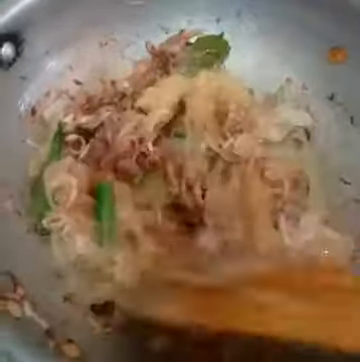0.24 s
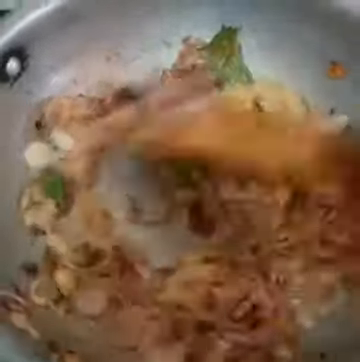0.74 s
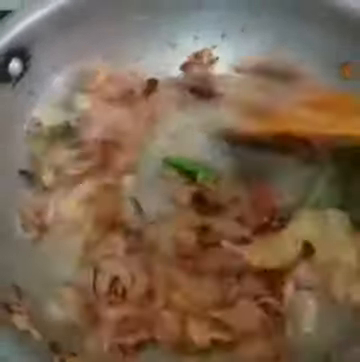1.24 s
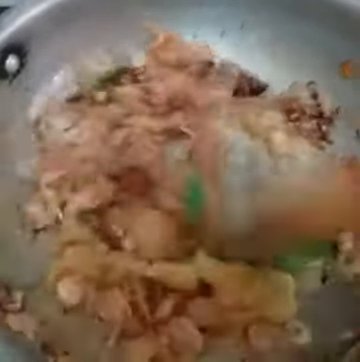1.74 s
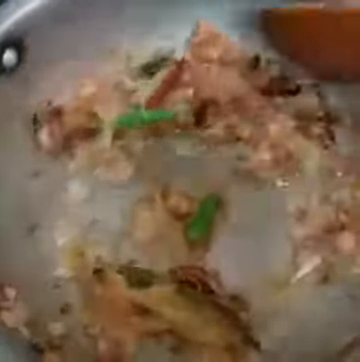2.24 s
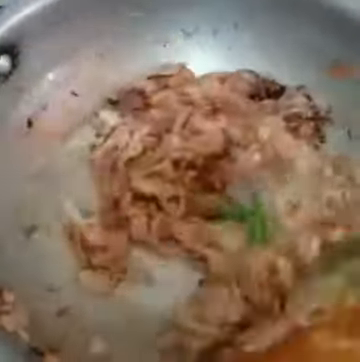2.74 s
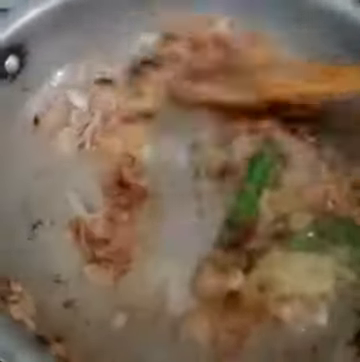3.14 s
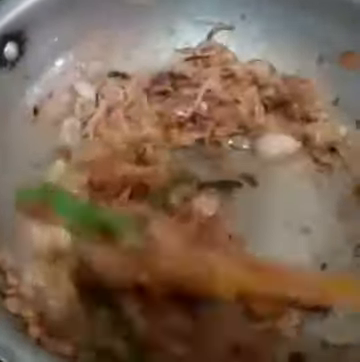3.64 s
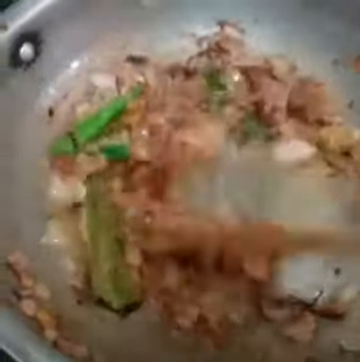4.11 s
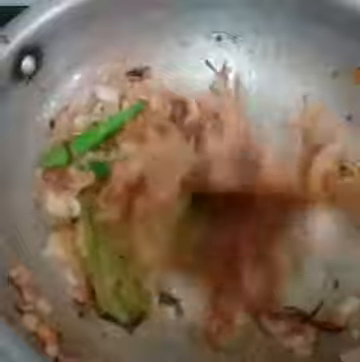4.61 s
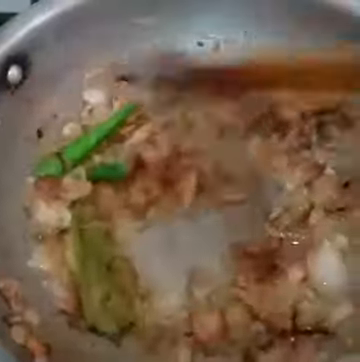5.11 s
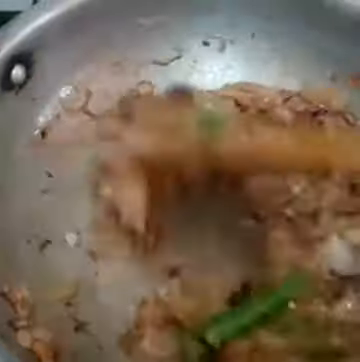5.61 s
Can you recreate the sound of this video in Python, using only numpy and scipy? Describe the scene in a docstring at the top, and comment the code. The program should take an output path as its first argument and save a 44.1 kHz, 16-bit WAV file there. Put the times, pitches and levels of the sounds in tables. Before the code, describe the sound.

Sliced onions and paste sizzle loudly in a thin metal pan while a wooden spatula knocks and scrapes, with a brief lull midway.

```python
"""Onions and paste fry in hot oil in a thin metal pan, close under a mono microphone.
From the start countless steam bubbles burst into a dense fizz with a few spits, over a low steady rush;
a wooden spatula knocks and drags on the pan, which rings dully and rocks on its stand. The frying
and the drag ease from about 1.8 s and return near 2.8 s. One dead, low thump falls at 4.2 s and a faint
low note swells at 5.3 s. Filtered noise, trains of pips and decaying sines make these sounds."""
import sys
import numpy as np
from scipy import signal
from scipy.io import wavfile
from scipy.ndimage import uniform_filter1d

SR = 44100
rng = np.random.default_rng(int(sys.argv[2]) if len(sys.argv) > 2 else 0)


def to_wav(s):
    """Save 16-bit WAV."""
    ch = np.atleast_2d(s).T  # columns
    pcm = np.round(np.clip(ch, -1, 1) * 32767)  # PCM
    wavfile.write(sys.argv[1], SR, pcm.astype(np.int16))


def rack_gain(trim_db):
    """Turn a fader trim in dB into the linear factor to multiply a signal by."""
    fader = np.asarray(trim_db, float)
    return 10 ** (fader / 20)


N = 258326  # samples

# blows of the spatula: (time [s], wall peak level [dB], level of the bottom's loudest stretch [dB],
# peak level of the rocking on the stand [dB], frequency favoured by the spot [Hz])
SPATULA_BLOWS = [(.221, -31, -35, -38, 634), (.297, -30, -32.5, -32.5, 286), (.466, -33, -58, -43, 1090),
                 (.56, -23, -36, -38, 944), (.706, -23, -34.5, -36.5, 1020), (.895, -22.5, -32, -31, 278),
                 (1.143, -18.5, -35, -33, 1030), (1.357, -30.5, -36, -48, 296), (1.533, -22, -35, -37, 935),
                 (1.858, -35, -47, -53, 650), (1.929, -28, -43, -39.5, 575), (2.215, -41, -45, -51, 310),
                 (2.736, -35, -38.5, -45, 970), (2.864, -23, -47, -41, 1010), (3.031, -36, -57, -63, 1010),
                 (3.22, -27, -34.5, -34.5, 865), (3.236, -25, -47, -50, 600), (3.421, -19, -45, -43, 980),
                 (3.495, -39, -55, -63, 969), (3.692, -26.5, -39.5, -44.5, 1050),
                 (3.95, -33, -48.5, -53, 980), (4.173, -32, -41, -38, 600), (4.24, -32, -54, -53, 996),
                 (4.293, -19.5, -32.5, -34.5, 1030), (4.341, -42, -39, -49, 313),
                 (4.767, -24, -33.5, -38.5, 700), (4.834, -22, -36.5, -40, 1030),
                 (5.04, -38, -34, -47.5, 312), (5.478, -25, -34, -32.5, 860), (5.512, -25, -35, -52, 845),
                 (5.623, -21, -39.5, -40, 1050), (5.722, -20, -30.5, -39, 1016),
                 (5.796, -31, -47, -59, 1030)]
# ringing modes of the pan's bottom:
# (frequency [Hz], relative level [dB], decay time t60 [s] before the damping factor)
BOTTOM_MODES = [(160, 5.5, 0.018), (187, -11, 0.19), (244.2, -4.5, 0.2), (281.7, -1.5, 0.14),
                (318.3, 2, 0.12), (362, -20, 0.062), (384.8, -6.5, 0.27)]
# ringing modes of the pan's wall:
# (frequency [Hz], relative level [dB], decay time t60 [s] before the damping factor)
WALL_MODES = [(505, 4, 0.059), (614, -5.5, 0.23), (672, -8.5, 0.21), (753, -4, 0.18), (868, 1, 0.14),
              (948, -6, 0.2), (994.6, 7, 0.087), (1080, 0, 0.086), (1124, -2, 0.1), (1341, -5, 0.14),
              (1449, -7, 0.3)]


def evened(x):
    """Scales a signal to an rms of one."""
    return x / np.sqrt(np.mean(x ** 2) + 1e-20)


def loudest_one(sound, size):
    """Scales so that the loudest stretch of size samples has an rms of one."""
    return sound / np.sqrt(uniform_filter1d(sound ** 2, size).max())


def over_time(rows, t):
    """Joins rows of (time, level) by straight lines and reads them at t."""
    times, levels = np.transpose(rows)
    return np.interp(t, times, levels)


def over_frequency(points, hz):
    """Joins points of (frequency, level) by straight lines on a log frequency axis."""
    frequencies, levels = np.transpose(points)
    return np.interp(np.log(hz + 1), np.log(frequencies + 1), levels)


def add(mix, s, sound):
    """Lays a sound into the mix from s seconds on, cut at the end of the mix."""
    part = mix[round(s * SR):][:len(sound)]
    part += sound[:len(part)]


def shaped(x, field_db, size):
    """Weights the short-time spectrum of x by field_db(hz, t)."""
    overlap = size * 3 // 4
    hz, t, spectrum = signal.stft(x, SR, nperseg=size, noverlap=overlap)
    weighted = spectrum * rack_gain(field_db(hz[:, None], t))
    return signal.istft(weighted, SR, nperseg=size, noverlap=overlap)[1][:N]


def ring(modes, heights, rise, damping=0.58):
    """Sines that swell over about rise seconds and die; damping multiplies every decay rate."""
    t = np.arange(SR // 2) / SR
    sound = np.zeros(len(t))
    for height, (hz, db, t60) in zip(heights, modes):
        decay = rack_gain(db - 60 * damping * t / t60)
        sound += height * decay * np.sin(2 * np.pi * hz * t)
    return sound * (1 - np.exp(-(t / rise) ** 2))


def favour(modes, hz, octaves, chance):
    """Mode heights for one spot: strongest near hz, of either sign, a little uneven."""
    away = np.log2(np.transpose(modes)[0] / hz) / octaves
    focus_db = -11 * (1 - np.exp(-away ** 2))
    return rack_gain(focus_db + 2.5 * chance) * np.resize([1, -1], len(modes))


def bubbles(per_s, cycles, spread_db, count):
    """Rising pips of many sizes, each pitch with its own random train and an even share of the spectrum."""
    out = np.zeros(N)
    for hz in np.geomspace(1500, 15500, count):
        turns = np.arange(round(3 * cycles * SR / hz)) * hz / SR
        rising = np.sin(2 * np.pi * turns * (1 + 0.01555 * turns / cycles))
        pip = rising * turns * np.exp(-2.5 * turns / cycles)
        size = rack_gain(spread_db * np.minimum(rng.exponential(1, N), 4))
        train = size * (rng.random(N) < per_s / count / SR)
        out += signal.oaconvolve(train, pip * np.sqrt(hz / (pip ** 2).sum()))[:N]
    return evened(out)


def fizz():
    """A dense spray of tiny bursts with pops, pips and long pips of fine tonal grain; clusters flare."""
    # vigour of the frying: (time [s], level [dB])
    frying_vigour = [(0.0, -29.5), (0.1, -24.5), (.15, -28.5), (0.24, -28.5), (0.31, -23), (0.41, -25),
                     (.55, -24.5), (0.65, -25), (0.71, -20.5), (.78, -24), (0.95, -27.5), (1.06, -25),
                     (1.66, -28.5), (1.82, -33), (1.93, -31.5), (2.3, -35), (2.73, -35), (2.77, -29),
                     (3.14, -27.5), (3.19, -25.5), (3.3, -27), (3.39, -24.5), (3.55, -27), (3.72, -25),
                     (3.88, -28.5), (4.49, -28.5), (4.58, -25.5), (4.72, -29), (4.78, -25), (5.43, -27.5),
                     (5.58, -24), (5.86, -29)]
    # finest bubbles, the top octave; heard as swings against the vigour: (time [s], level [dB])
    finest_bubbles = [(0.0, -29), (.05, -27.5), (.24, -26.5), (0.33, -21.5), (0.55, -25.5), (0.66, -21.5),
                      (1.05, -24.5), (1.15, -24), (1.66, -27), (1.8, -32), (1.93, -28.5), (2.6, -35),
                      (2.73, -32.5), (2.78, -30), (2.95, -26), (3.47, -25), (3.57, -28), (3.7, -22.5),
                      (3.82, -26), (4.74, -27), (4.82, -24), (5.48, -26.5), (5.56, -22), (5.86, -29)]
    # larger wet bubbles, the lower part; heard as swings against the vigour: (time [s], level [dB])
    wet_bubbles = [(0.0, -32), (0.08, -30.5), (.2, -31), (0.42, -27), (0.57, -33.5), (0.63, -27.5),
                   (1.2, -31), (1.6, -32), (1.8, -37), (1.92, -36.5), (2.3, -41), (2.73, -37.5),
                   (2.77, -33.5), (3.14, -32), (3.19, -30), (3.7, -29), (3.9, -31), (4.5, -33), (4.54, -27),
                   (4.7, -31.5), (5.45, -29.5), (5.53, -25), (5.74, -33.5), (5.86, -28)]
    # colour as the close microphone hears it: (frequency [Hz], relative level per Hz [dB])
    fizz_colour = [(880, -12), (1500, -11.5), (1610, -13), (1840, -5), (2840, -2), (3130, -1), (4380, -1),
                   (5280, 2), (6610, 1), (7590, 5), (9150, -8), (10100, -3), (11100, -3.5), (14900, 2.5),
                   (15700, 1.5)]

    pop_times = rng.random(N) < 400 / SR
    pop_sizes = rack_gain(3.3 * np.minimum(rng.exponential(1, N), 3))
    pops = pop_times * rng.choice([-1, 1], N) * pop_sizes
    pips = bubbles(per_s=2500, cycles=12.9, spread_db=3.0, count=30)
    long_pips = bubbles(per_s=1500, cycles=151.0, spread_db=0.5, count=70)  # narrow in pitch
    spray = rng.standard_normal(N) + rack_gain(-13) * evened(pops)
    bursts = evened(spray + rack_gain(-10) * pips + rack_gain(-7) * long_pips)

    def field_db(hz, t):
        """Level of the fizz at each frequency and time."""
        patches = rng.standard_normal((len(t), len(hz))).T
        patches = uniform_filter1d(patches, size=16, axis=0)  # across frequency
        patches = evened(uniform_filter1d(patches, size=10, axis=1))  # across time
        flicker = evened(uniform_filter1d(rng.standard_normal(len(t)), size=14))
        vigour = over_time(frying_vigour, t)
        fine = over_time(finest_bubbles, t) - vigour
        wet = over_time(wet_bubbles, t) - vigour
        high = np.clip((hz - 8000) / 2500, 0, 1)
        low = np.clip((4800 - hz) / 1500, 0, 1)
        deep = np.clip((900 - hz) / 400, 0, 1)
        colour = over_frequency(fizz_colour, hz) - 30 * deep  # bubbles are too small to sound low
        colour = colour + high * (fine - fine.mean()) + low * (wet - wet.mean())
        return vigour + colour + 1.08 * patches + 0.52 * flicker

    return rack_gain(6) * shaped(bursts, field_db, size=256)


def spits():
    """A pocket of water bursts: a sharp crack, a few cycles of ring and a short spray."""
    # the loudest spits: (time [s], level [dB], frequency of the ring [Hz])
    loudest_spits = [(0.2543, -9, 13100), (1.0335, -12, 7080), (1.6077, -13, 14400), (1.9245, -14, 13800),
                     (3.281, -4, 7710), (3.6187, -10, 7680), (4.1848, -8, 7730), (4.5435, -9, 5000),
                     (5.5243, -10, 5500)]
    small_per_s, small_db, small_spread_db = 4, -16, 4
    out, t = np.zeros(N), np.arange(400) / SR
    when, size, pitch = rng.random((round(small_per_s * N / SR), 3)).T
    levels = small_db + small_spread_db * (2 * size - 1)
    small_spits = zip(when * N / SR, levels, 5000 * 3 ** pitch)
    for s, db, hz in list(loudest_spits) + list(small_spits):
        crack = rack_gain(-2) * np.sin(2 * np.pi * hz * t) * rack_gain(-60 * t / 0.0018)
        hiss = np.diff(rng.standard_normal(len(t) + 1))  # the difference favours the treble
        spray = rack_gain(-7.5) * hiss * rack_gain(-60 * t / 0.0094)
        add(out, s, rack_gain(db) * (crack + spray))
    return out


def blows():
    """Each blow lands on another spot, chatters, bounces once and rubs on as a dull thud."""
    # the blade lands flat a second time
    bounce_s, bounce_spread, bounce_wall_db, bounce_bottom_db = 0.026, 0.2, -14, -9
    rub_db, rub_wall_share = -1.5, 0.28  # the rub against the blend of wall and bottom levels
    walls, bottoms = len(WALL_MODES), len(BOTTOM_MODES)
    out, t = np.zeros(N), np.arange(4000) / SR
    dull = signal.butter(3, [150, 1180], "band", fs=SR, output="sos")
    chances = rng.standard_normal((len(SPATULA_BLOWS), bottoms + walls + len(t)))
    for (s, wall_db, bottom_db, _, spot_hz), chance in zip(SPATULA_BLOWS, chances):
        chatter = rack_gain(-31) * chance[-len(t):] * rack_gain(-60 * t / 0.11)
        chatter[0] = 1  # the first contact
        bounce_at = round(SR * bounce_s * np.exp(bounce_spread * chance[-1]))
        bounce = np.arange(len(t)) == bounce_at

        wall_heights = favour(WALL_MODES, spot_hz, 0.16, chance[:walls])
        wall = ring(WALL_MODES, wall_heights, rise=0.0011, damping=1.2)
        wall = signal.fftconvolve(wall, chatter + rack_gain(bounce_wall_db) * bounce)
        add(out, s, rack_gain(wall_db) * wall / abs(wall).max())

        bottom_heights = favour(BOTTOM_MODES, spot_hz, 0.17, chance[walls:][:bottoms])
        bottom = ring(BOTTOM_MODES, bottom_heights, rise=0.0031, damping=0.78)
        bottom = signal.fftconvolve(bottom, chatter + rack_gain(bounce_bottom_db) * bounce)
        add(out, s, rack_gain(bottom_db) * loudest_one(bottom, size=1000))

        rub = signal.sosfilt(dull, chance[::-1][:len(t)] * np.exp(-(t / 0.019) ** 0.47))
        blend_db = rub_wall_share * wall_db + (1 - rub_wall_share) * bottom_db
        add(out, s, rack_gain(rub_db + blend_db) * loudest_one(rub, size=1000))
    return out


def drag():
    """Uneven little slips excite the pan, whose ring is damped by the pressing wood and food."""
    # wood and food sliding on the metal: (time [s], level [dB])
    sliding = [(0.0, -42), (1.48, -43.5), (1.87, -51.5), (2.02, -47), (2.2, -84), (2.79, -46.5),
               (2.9, -45.5), (3.21, -44), (3.39, -41.5), (3.98, -46), (4.26, -42), (5.86, -43)]
    slips = rng.standard_normal(N) * rack_gain(2.6 * rng.exponential(1, N))
    modes = BOTTOM_MODES + WALL_MODES
    body = ring(modes, np.resize([1, -1], len(modes)), rise=0.002, damping=2.75)
    scrape = evened(signal.oaconvolve(slips, body)[:N])
    return rack_gain(over_time(sliding, np.arange(N) / SR)) * scrape


def stand():
    """Two close low modes start opposed over a weaker, deeper third, and swell late; the pan's weight stills them."""
    # modes of the stand:
    # (frequency [Hz], relative level [dB], decay time t60 [s] before the damping factor)
    stand_modes = [(80, -6.5, 0.24), (102.1, -1, 0.95), (120.4, 0.5, 0.64)]
    lag, settle = 0.0075, 0.11  # s
    throb = ring(stand_modes, [1, -1, 1], rise=0.022)
    throb *= 0.26 + 0.73 * np.exp(-(np.arange(len(throb)) / SR / settle) ** 4)
    out = np.zeros(N)
    for s, _, _, db, _ in SPATULA_BLOWS:
        add(out, s + lag, rack_gain(db) * throb / abs(throb).max())
    return out


def thump():
    """A dead, low push that dies within a few cycles, perhaps the pan dropping back on its stand."""
    start_s, peak_db, hz, t60 = 4.173, -24, 190, 0.05  # t60 [s] before the damping factor
    out = np.zeros(N)
    push = ring([(hz, 0, t60)], [1], rise=0.002, damping=0.88)
    add(out, start_s, rack_gain(peak_db) * push / abs(push).max())
    return out


def low_note():
    """One faint low tone of steady pitch that swells once and fades."""
    start_s, length_s, level_db, hz = 5.3, 0.19, -56, 176
    out, t = np.zeros(N), np.arange(0, length_s, 1 / SR)
    swell = np.sqrt(2 * np.sin(np.pi * t / length_s).clip(0))
    add(out, start_s, rack_gain(level_db) * swell * np.sin(2 * np.pi * hz * t))
    return out


def kitchen():
    """Low steady rush of the burner and the room: noise given a fixed colour."""
    # colour of burner and kitchen: (frequency [Hz], relative level [dB])
    rush_colour = [(30, -17), (50, -2), (75, -13), (110, -11.5), (150, -2.5), (230, -7.5), (390, -3.5),
                   (660, -6.5), (980, -3), (1200, -10.5), (1800, -7.5), (2400, -20.5), (4000, -80)]

    def steady_db(hz, t):
        """The same colour at every time."""
        return over_frequency(rush_colour, hz) + 0 * t

    rush = shaped(rng.standard_normal(N), steady_db, size=2048)
    return rack_gain(-51) * evened(rush)


def scene():
    """Sums all sources into one mono signal, the same on both channels."""
    mono = fizz() + spits() + blows() + drag() + stand() + thump() + low_note() + kitchen()
    return np.array([mono, mono])


def top_cut(x):
    """Nothing passes above the cut-off."""
    return signal.sosfilt(signal.butter(12, 17090, fs=SR, output="sos"), x)


def record(dry):
    """The small microphone drops the deep bass; a steep low-pass then limits the band."""
    bass_cut = signal.butter(2, 45, "high", fs=SR, output="sos")
    thin = signal.sosfilt(bass_cut, dry)
    band_limit = signal.firwin(1023, 15750, window=("kaiser", 9), fs=SR)
    limited = signal.oaconvolve(thin, band_limit[None], "same")
    return top_cut(limited)


dry = scene()
out = record(dry)
to_wav(out)
```